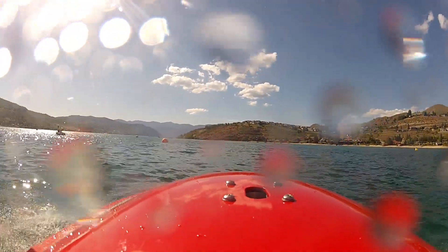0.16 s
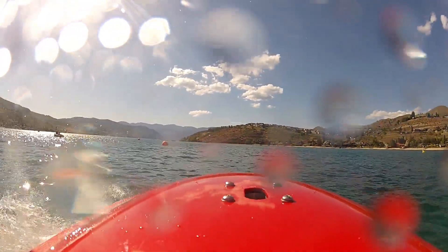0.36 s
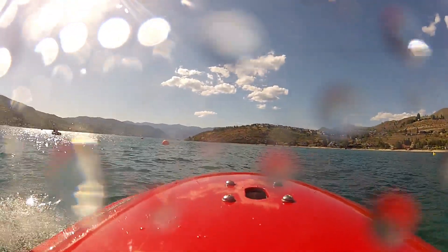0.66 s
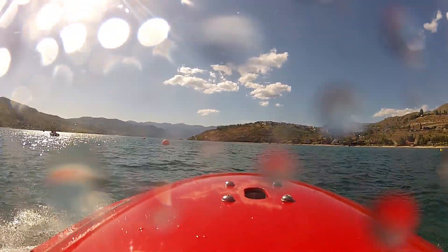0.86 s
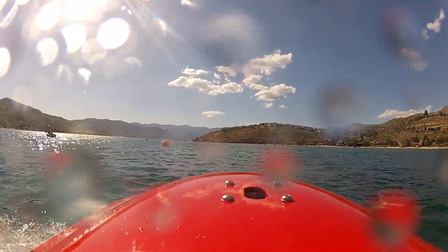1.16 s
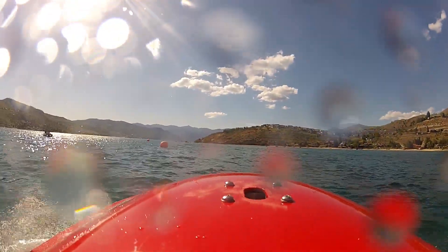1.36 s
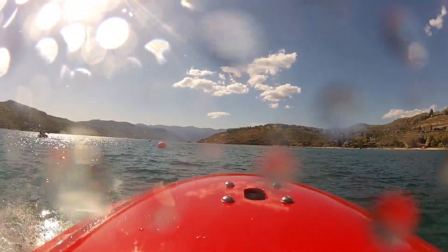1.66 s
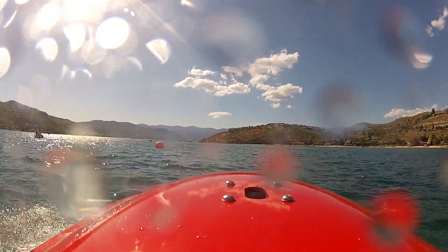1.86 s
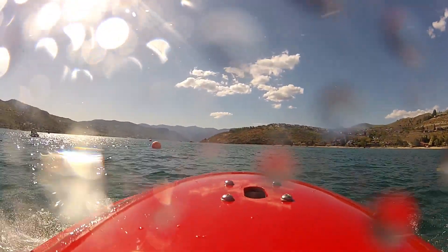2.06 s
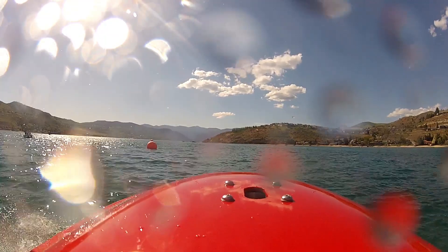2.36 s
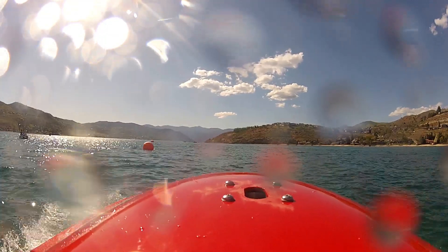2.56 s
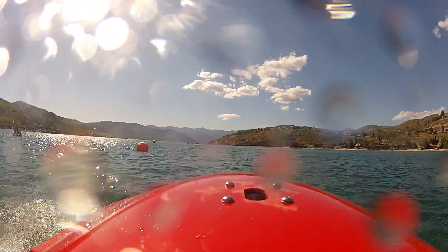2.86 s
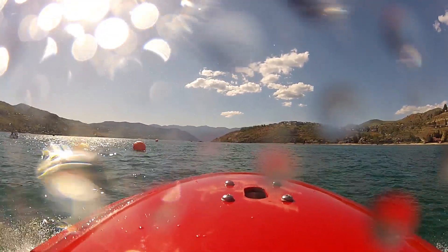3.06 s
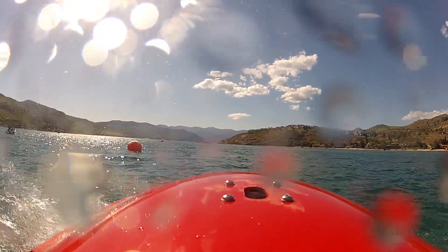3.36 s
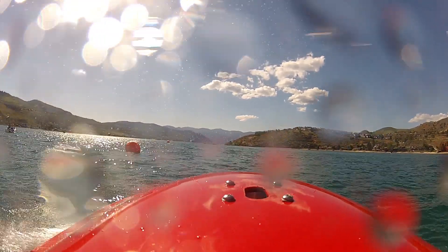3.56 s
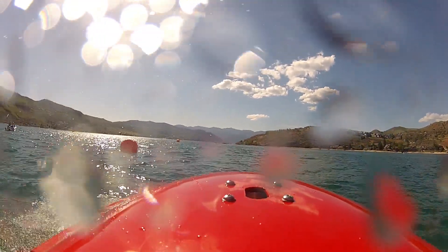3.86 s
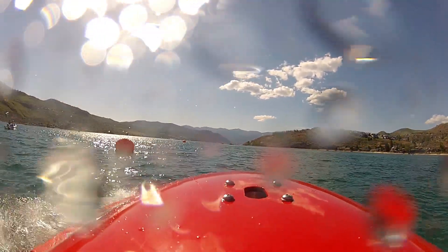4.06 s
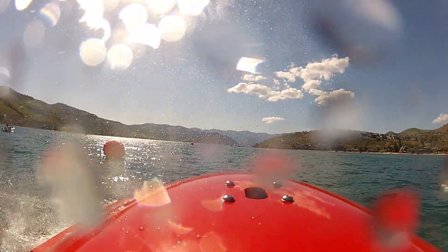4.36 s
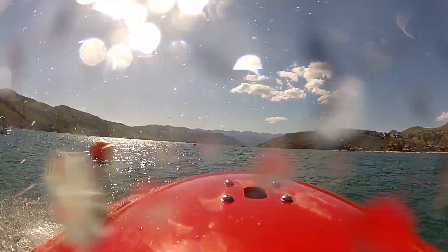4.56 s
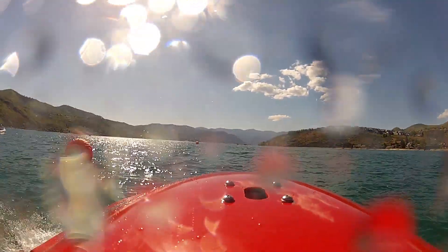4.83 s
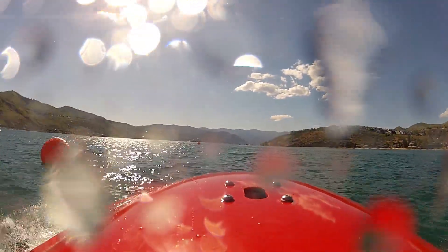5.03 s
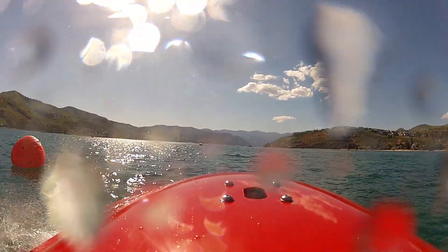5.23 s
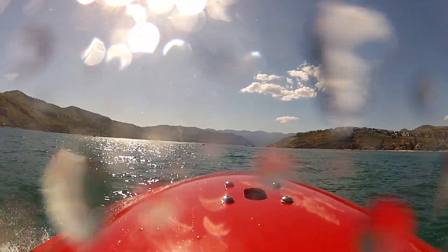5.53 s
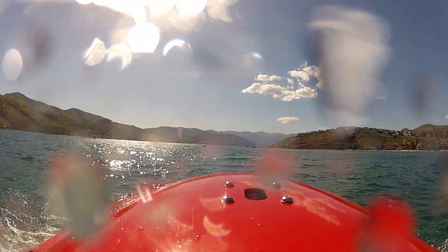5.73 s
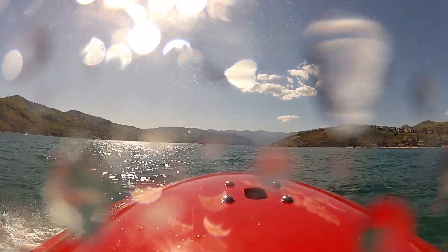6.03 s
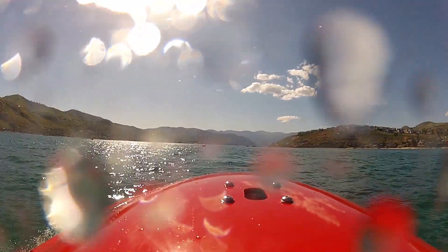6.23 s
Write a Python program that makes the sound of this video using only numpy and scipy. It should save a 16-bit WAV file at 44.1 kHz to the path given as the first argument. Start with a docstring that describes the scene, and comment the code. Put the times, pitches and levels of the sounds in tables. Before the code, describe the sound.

A racing boat runs at speed on open water, heard from a sealed microphone housing on its deck. The engine's low drone rises and falls while the plastic housing buzzes and clacks. Waves bring quick surges of rumble and spray, with a few dull thumps in the first half. Toward the end the engine revs higher, the spray thickens and drops tick on the shell. The sound is close, boxy and gritty.

```python
"""Hydroplane, on deck at speed

Out on the water; the microphone is inside a sealed camera on a racing boat's deck, close to everything.
The engine drones and revs through the deck and rattles the housing. Each wave loads the hull, then shakes
the camera and throws spray; between waves the hull skips clear and all eases. Spray thickens in the turn
and drops tick on the shell. The hardest knocks overload the camera; its coarse clock adds a gritty fizz."""
import sys
import numpy as np
from scipy import signal
from scipy.fft import rfft, irfft
from scipy.io import wavfile
from scipy.ndimage import uniform_filter1d

SR = 44100
rng = np.random.default_rng(int(sys.argv[2]) if len(sys.argv) > 2 else 0)


def output_pcm(signal):
    """Save a mono or channel-first signal as 16-bit PCM at the path in sys.argv[1].

    Samples are clipped to [-1, 1] before scaling.
    """
    pcm = np.clip(np.atleast_2d(signal).T, -1, 1) * 32767
    wavfile.write(sys.argv[1], SR, np.round(pcm).astype(np.int16))


N = 281799
T = np.arange(N) / SR

# waves under the hull: (time [s], length [s], push on the deck [dB], splash [dB])
WAVES = [(0.134, 0.04, 11, 4), (.491, 0.4, 5, 2.5), (0.693, 0.24, 1, 8), (0.86, 0.067, 5.5, 11),
         (1, 0.11, 0, 2.5), (1.264, 0.22, 3.5, 4), (1.388, 0.21, 1, 4.5), (1.635, 0.25, 0.5, 2.5),
         (1.894, 0.12, 6.5, 7.5), (2.063, 0.14, 4, 3.5), (2.33, 0.26, 5, 9), (2.53, 0.036, 10, 6),
         (2.687, 0.21, 5, 4.5), (2.906, 0.26, 2.5, 5.5), (3.089, 0.029, 6, 12.5), (3.176, 0.08, 9, 1.5),
         (3.292, 0.17, 1, 8), (3.486, 0.031, 3, 3), (3.627, 0.15, 0.5, 7.5), (3.72, 0.11, 5, 3),
         (3.858, 0.19, 6, 6.5), (4.046, 0.22, 7.5, 7.5), (4.281, 0.13, 9, -0.5), (4.527, 0.2, 7, 6),
         (4.747, 0.12, 0.5, -3), (4.901, 0.24, 7, 5), (5.083, 0.22, 4.5, -0.5), (5.304, 0.15, 4, -4.5),
         (5.418, 0.12, 2.5, -0.5), (5.594, 0.099, 17, 4), (5.791, 0.084, 9, 1), (5.917, 0.054, 0, 4),
         (6.074, 0.2, 3, 3), (6.32, 0.15, 0, 2)]
# the hull lifting clear of the water: (time [s], drop in level [dB])
SKIPS = [(.325, 6), (.595, 7), (.914, 4), (1.345, 4.5), (2.398, 10.5), (2.589, 0), (3.242, 4.5),
         (4.191, 1.5), (4.419, 3), (4.843, 7.5), (5.704, 3.5), (6.205, 5)]
# wind and water on the hull, underfoot: (time [s], base level [dB])
RUMBLE_LEVEL = [(0, -17), (.9, -21.5), (1.5, -17), (2.2, -20.5), (2.9, -20), (3.7, -23), (4.3, -19.5),
                (4.7, -19), (5.6, -15.5), (6.39, -20.5)]
# that rumble through the deck: (frequency [Hz], gain [dB])
RUMBLE_COLOUR = [(18, -42), (32, -18), (50, -9), (90, -1), (130, 1.5), (190, -1.5), (270, -4.5),
                 (340, -10.5), (450, -27), (590, -16), (780, -29.5), (1100, -27), (2000, -43)]
# hard landings on a wave: (time [s], relative level [dB])
SLAPS = [(0.121, 4), (0.186, 7.5), (1.73, 6.5), (2.804, 5.5), (2.856, -2)]
# steady spray, thickest in the turn: (time [s], base level [dB])
SPRAY_LEVEL = [(0, -26.5), (1, -30), (1.4, -24.5), (2.2, -27.5), (3.4, -30.5), (4.4, -26.5), (5.2, -24),
               (5.55, -17), (5.8, -23.5), (6.39, -19.5)]
# water heard from inside the shell: (frequency [Hz], gain [dB])
WASH_COLOUR = [(250, 0.5), (420, -0.5), (590, 0.5), (780, -3.5), (1020, -5.5), (1220, 0), (1850, 5.5),
               (2650, 1), (3000, -15), (3500, -13), (4200, -18.5), (5000, -24), (5900, -53)]
SHEET_COLOUR = [(1500, -5), (2700, 3), (3300, -7), (5000, -6.5), (5900, -9), (7000, -40)]
# ticks and snaps: (frequency [Hz], gain [dB])
TICK_COLOUR = [(600, -4), (2500, 5.5), (4500, -2.5), (6000, 0.0), (7000, -40)]
# small drops on the shell: (time [s], level [dB])
DROP_LEVEL = [(0, -31), (.3, -32), (.55, -34.5), (.8, -50), (2.3, -80), (3.8, -34), (4.6, -34), (5.3, -35),
              (5.6, -32), (6.39, -30.5)]
# short bright snaps, from large drops and from overload on loud clacks: (time [s], relative level [dB])
SNAPS = [(0.4326, -13), (0.528, -13.5), (0.5696, -26), (0.8899, -34), (1.1612, -12), (1.3922, -14),
         (2.0104, -23), (2.123, -16), (2.2403, -16.5), (2.2764, -12.5), (2.4295, -17), (2.539, -14.5),
         (3.4898, -14.5), (3.5774, -14.5), (4.7177, -12.5), (4.7649, -8), (4.7894, -13), (5.1402, -9),
         (5.222, -8.5), (5.4313, -12)]
# the housing's hardest hits on its mount: (time [s], relative level [dB], ring [Hz])
CLACKS = [(0.0486, -2.5, 1960), (0.2445, 6, 1690), (0.378, -9, 1820), (0.4455, -3, 1830),
          (0.5193, -7.5, 1990), (0.5703, 0, 1900), (0.7381, -2.5, 1650), (0.8905, 1, 1950),
          (1.0245, -1, 1970), (1.0955, -5.5, 1900), (1.191, -3, 1860), (1.3009, -4.5, 2180),
          (1.502, -0.5, 1735), (1.5755, -2, 2120), (1.787, -2.5, 2310), (2.0094, -1.5, 1940),
          (2.0688, -4.5, 1800), (2.1266, -3.5, 1740), (2.148, -5, 1880), (2.2005, -6.5, 1890),
          (2.239, -8, 1760), (2.31, -7, 2060), (2.3345, -2.5, 1740), (2.4538, -3.5, 1750),
          (2.5397, -2, 1880), (2.582, -0.5, 1850), (2.6359, -8.5, 1830), (2.757, -2.5, 2074),
          (2.8313, -7, 1970), (2.8525, -9, 1990), (2.9622, -2.5, 1760), (3.1058, -1.5, 2050),
          (3.1628, -8, 1860), (3.21, -1.5, 2380), (3.29, -10, 1900), (3.4003, -2, 1900), (3.472, -7, 1868),
          (3.5072, -0.5, 1851), (3.5856, -1, 1833), (3.7664, -2, 1970), (3.825, -7.5, 1940),
          (3.9437, -3, 1775), (4.0572, -4, 1838), (4.3031, -2.5, 1950), (4.3496, -3, 1900),
          (4.5086, -2.5, 1800), (4.6195, -3, 2020), (4.7644, -4, 2600), (4.7885, -2, 1820),
          (4.8314, -10.5, 1920), (5.025, -0.5, 1250), (5.223, -7, 2094), (5.2942, -1.5, 1864),
          (5.3157, -5.5, 1800), (5.3449, -6.5, 1854), (6.1749, -4, 2041)]
# the housing's knocks, heard from within: (frequency [Hz], gain [dB])
CHATTER_COLOUR = [(300, -33), (600, -29), (800, -6.5), (1020, 2), (1200, 8), (1400, 0), (1850, 4),
                  (2200, 3), (2600, 6), (3000, -17), (3500, -1), (4200, -27), (5000, -6.5), (5900, -61)]
THUD_COLOUR = [(120, -18), (300, -4), (580, -5), (750, -32), (1500, -60)]
CLACK_COLOUR = [(200, -2), (550, -7), (800, -13), (1200, -5.5), (2700, 0), (3200, -19.5), (5000, -20),
                (5900, -12)]
# the camera's distortion on the hardest hits: (frequency [Hz], gain [dB])
OVERLOAD_COLOUR = [(1500, -20), (3500, -9), (5900, -1), (7000, -40)]
# engine speed: (time [s], firing rate [Hz])
FIRING_RATE = [(0.0, 76.6), (0.18, 79.4), (0.32, 71.13), (0.99, 71.66), (1.41, 93.67), (1.71, 74.65),
               (1.94, 73.24), (2.28, 79.54), (2.58, 79.3), (2.85, 72.86), (3.92, 71.73), (4.07, 82.87),
               (4.75, 83.1), (4.93, 89.34), (5.3, 85.9), (5.61, 112.4), (6.1, 87.58), (6.39, 109.2)]
# engine orders around the drone: (multiple of the firing rate, gain at low revs [dB], at high revs [dB])
ORDERS = [(.5, -10, -8.5), (1.5, -28, -16), (2, -9.5, -3), (2.5, -9, -15.5), (3, -1.5, -7), (4, -11.5, -17),
          (5, -22.5, -20), (6, -20, -32), (7, -50, -24.5)]
# those orders together: (time [s], base level [dB])
ORDER_LEVEL = [(0, -23), (1, -24.5), (1.4, -22.5), (2, -23), (3, -26.5), (3.6, -21.5), (3.85, -29.5),
               (4.5, -22), (5.6, -19), (6.39, -19)]


def amp(db):
    """Decibels to gain."""
    return 10 ** (np.asarray(db) / 20)


def unit(x):
    """Scales to rms 1."""
    return x / np.sqrt(np.mean(x ** 2) + 1e-20)


def curve(rows):
    """Joins (time, value) rows by straight lines."""
    return np.interp(T, *np.transpose(rows))


def colour(x, points):
    """Filters x by a spectrum of (frequency [Hz], gain [dB]) points."""
    hz, db = np.transpose(points)
    f = np.fft.rfftfreq(N, 1 / SR)
    return irfft(rfft(x) * amp(np.interp(np.log(f + 1), np.log(hz), db)), N)


def wander(hz):
    """Smooth random motion of rms 1, up to about hz changes a second."""
    f = np.fft.rfftfreq(N, 1 / SR)
    return unit(irfft(rfft(rng.standard_normal(N)) * np.exp(-(f / hz) ** 2), N))


def add(mix, s, sound):
    """Mixes a sound in at time s."""
    part = mix[max(0, round(s * SR)):][:len(sound)]
    part += sound[:len(part)]


def arch(s, length, lean=1):
    """A half sine around time s; with lean above 1 it builds slowly and breaks off quickly."""
    return np.sin(np.pi * np.clip((T - s) / length + .5, 0, 1) ** lean)


def ride(skip_s=0.12, splash_lag_s=0.016, chop_db=1.5):
    """Each wave pushes on the deck, then splashes; skips ease both, and ripples jostle the splash."""
    lift_db = sum(db * arch(s, skip_s) for s, db in SKIPS)
    push_db = sum(db * arch(s, length) for s, length, db, _ in WAVES)
    splash_db = sum(db * arch(s + splash_lag_s, length, lean=1.46) for s, length, _, db in WAVES)
    return push_db - lift_db, splash_db - lift_db + chop_db * wander(hz=22.4)


def hull_rumble(splash_db, coupling=0.77, lump_db=1.84):
    """Wind and water rumble below the microphone, swelling with each splash."""
    rumble = unit(colour(rng.standard_normal(N), RUMBLE_COLOUR) * amp(lump_db * wander(hz=28.7)))
    return rumble * amp(curve(RUMBLE_LEVEL) + coupling * splash_db)


def hull_slaps(boom_hz=118, panel_hz=165, rise_s=0.0081, gain_db=-9):
    """A hard landing sets two damped panel modes booming under the deck."""
    t, out = np.arange(SR // 6) / SR, np.zeros(N)
    envelope = t / rise_s * np.exp(1 - t / rise_s)
    modes = np.sin(2 * np.pi * boom_hz * t) + 0.46 * np.sin(2 * np.pi * panel_hz * t)
    for s, db in SLAPS:
        add(out, s, amp(db + gain_db) * envelope * modes)
    return out


def spray(cycles, splash_db, throb_depth=0.11, sheet_db=-7, coupling=0.69):
    """Spray washes over the shell, throbbing with the engine; heavy spray adds a brighter hiss."""
    # spray hangs in the air, so it follows the quick surges only in part
    level_db = curve(SPRAY_LEVEL) + coupling * splash_db
    throb = 1 + throb_depth * np.cos(2 * np.pi * cycles)
    wash = unit(colour(rng.standard_normal(N), WASH_COLOUR) * amp(3 * wander(hz=93)) * throb)
    sheet = unit(colour(rng.standard_normal(N), SHEET_COLOUR))
    heavy_db = level_db - level_db.max()
    return (wash + sheet * amp(sheet_db + heavy_db)) * amp(level_db)


def drops_and_snaps(per_s=260, tick_decay_s=0.0016, snap_db=6, snap_decay_s=0.0019):
    """Small drops tick on the shell; large drops, and overload on a few loud clacks, snap brightly."""
    t, snaps = np.arange(200) / SR, np.zeros(N)
    hits = (rng.random(N) < per_s / SR) * amp(4.8 * np.minimum(rng.exponential(1, N), 4))
    ticks = signal.fftconvolve(hits, np.exp(-t / tick_decay_s))[:N] * rng.standard_normal(N)
    for s, db in SNAPS:
        add(snaps, s, amp(db + snap_db) * np.exp(-t / snap_decay_s) * rng.standard_normal(len(t)))
    return unit(colour(ticks, TICK_COLOUR)) * amp(curve(DROP_LEVEL)) + colour(snaps, TICK_COLOUR)


def buzz(hz, length_s, grit, push, glide=0.38, swell=0.11):
    """Plastic buzzes against its mount: a sliding ring, a gritty edge and a one-sided contact force."""
    progress = np.linspace(-.5, .5, max(16, int(length_s * SR)))
    cycles = np.cumsum(hz * (1 + glide * rng.standard_normal() * progress)) / SR
    ring = np.sin(2 * np.pi * (cycles + rng.random()))
    envelope = signal.windows.tukey(len(progress), .6) * (1 + swell * progress)
    return envelope * (ring + grit * rng.standard_normal(len(progress)) + push)


def housing_clacks(hit_db=-0.4, scrape_db=-22, scrape_s=0.00271, overload_db=-7, overload_s=0.0018):
    """The jolted housing scrapes, then hits its mount; the hardest hits overload the camera."""
    t, body, overload = np.arange(400) / SR, np.zeros(N), np.zeros(N)
    for s, db, hz in CLACKS:
        add(body, s - scrape_s, amp(db + scrape_db) * buzz(hz, scrape_s, grit=2, push=0.083))
        add(body, s, amp(db + hit_db) * buzz(hz, length_s=0.00344, grit=1, push=0.083))
        burst = np.exp(-t / overload_s) * rng.standard_normal(len(t))  # noise stands for the distortion
        add(overload, s, amp(overload_db + 3 * min(db, 0)) * burst)
    return colour(body, CLACK_COLOUR) + colour(overload, OVERLOAD_COLOUR)


def housing_chatter(cycles, splash_db, level_db=-26, ring_hz=1950, knock_s=0.0027, slop_s=0.0007,
                    spread_db=10, seated_db=7, inward_db=7, thud_db=-7):
    """Around the microphone, the housing knocks at both ends of each engine swing, harder outward."""
    swing_ends = np.flatnonzero(np.diff(np.floor(2 * cycles)))
    clump_db, knocks = 3 * wander(hz=30.8), np.zeros(N)
    uneven_db = spread_db / (0.5 + np.maximum(splash_db / seated_db, 0))  # a splash evens the knocks out
    chances = rng.standard_normal((len(swing_ends), 4))
    for k, (i, (size, late, pitch, hold)) in enumerate(zip(swing_ends, chances)):
        gain = amp(uneven_db[i] * min(size, 1) + clump_db[i] - inward_db * (k % 2))
        knock = buzz(ring_hz * np.exp(0.1555 * pitch), knock_s * np.exp(0.3 * hold), grit=2.17, push=0.59)
        add(knocks, i / SR + slop_s * late, gain * knock)
    rattle = colour(knocks, CHATTER_COLOUR) + amp(thud_db) * colour(knocks, THUD_COLOUR)
    # the shaking sets the power that the knocks share among them
    rattle /= np.sqrt(abs(uniform_filter1d(rattle ** 2, size=4500)) + 1e-9)
    wetter_db = curve(SPRAY_LEVEL) - curve(SPRAY_LEVEL).mean()
    return rattle * amp(level_db + 0.99 * splash_db + 0.27 * wetter_db)


def engine(cycles, push_db, splash_db, low_hz=77.4, high_hz=109, jitter_cycles=0.022, load=0.83):
    """Close by, the firing rate drones through the deck; other orders surge and shift with the revs."""
    revs = np.clip((curve(FIRING_RATE) - low_hz) / (high_hz - low_hz), 0, 1)
    uneven = cycles + jitter_cycles * wander(hz=23)
    # the deck passes less of the drone as the revs rise
    drone_db = np.interp(revs, [0, 1], [-14, -23.5]) + load * push_db
    out = amp(drone_db) * np.cos(2 * np.pi * uneven) * (1 + 0.2 * wander(hz=19))
    orders_db = curve(ORDER_LEVEL) + 0.9 * splash_db
    for order, low_db, high_db in ORDERS:
        tone = np.cos(2 * np.pi * (order * uneven + rng.random()))
        flutter = 1 + 0.38 * wander(hz=18)
        out += amp(orders_db + low_db + revs * (high_db - low_db)) * tone * flutter
    return np.sqrt(2) * out


def scene():
    """Boat, housing and water all reach one microphone through the camera's shell."""
    cycles = np.cumsum(curve(FIRING_RATE)) / SR
    push_db, splash_db = ride()
    boat = engine(cycles, push_db, splash_db) + hull_rumble(splash_db) + hull_slaps()
    housing = housing_chatter(cycles, splash_db) + housing_clacks()
    return (boat + housing + spray(cycles, splash_db) + drops_and_snaps())[None]


def record(dry, input_hz=5550, clock_hz=12000, ceiling=0.88, edge_hz=15450):
    """The camera filters, samples slowly and overloads; held samples mirror the sound around its clock."""
    band = signal.oaconvolve(dry[0], signal.firwin(91, input_hz, fs=SR), "same")
    samples = signal.resample(band, round(N * clock_hz / SR))
    limited = samples / (1 + (samples / ceiling) ** 30) ** (1 / 30)
    held = signal.resample(np.repeat(limited, 8), N)
    bright = colour(held, [(8000, 0.3), (11000, 1), (14300, 1), (15300, 1.5)])
    low_pass = signal.firwin(201, edge_hz, window=("kaiser", 9), fs=SR)
    return signal.oaconvolve(bright, low_pass, "same")[None]


dry = scene()
out = record(dry)
output_pcm(out)
```